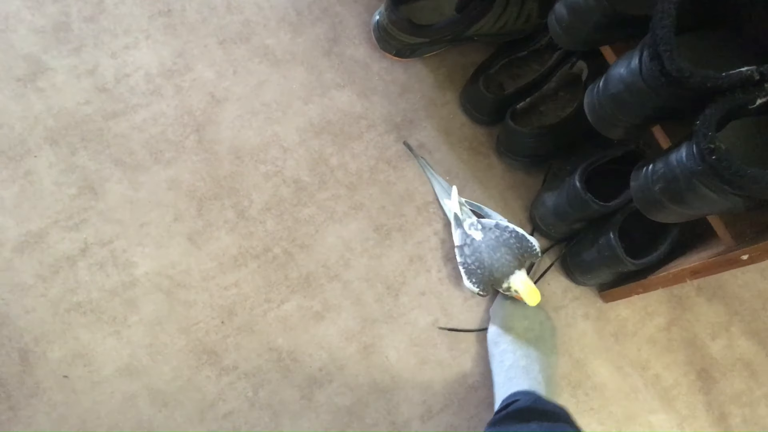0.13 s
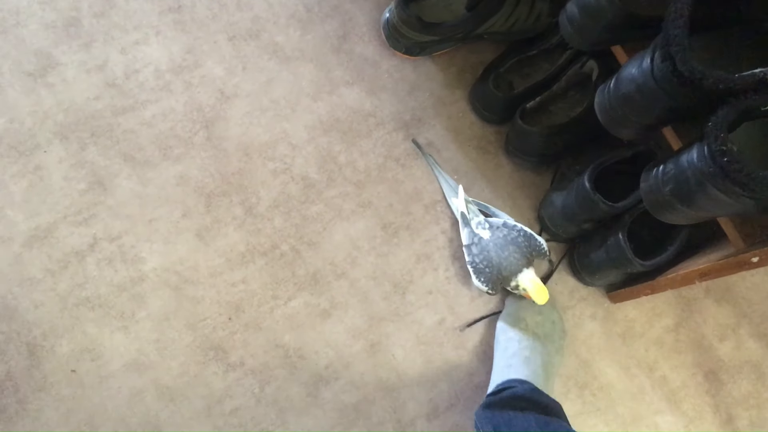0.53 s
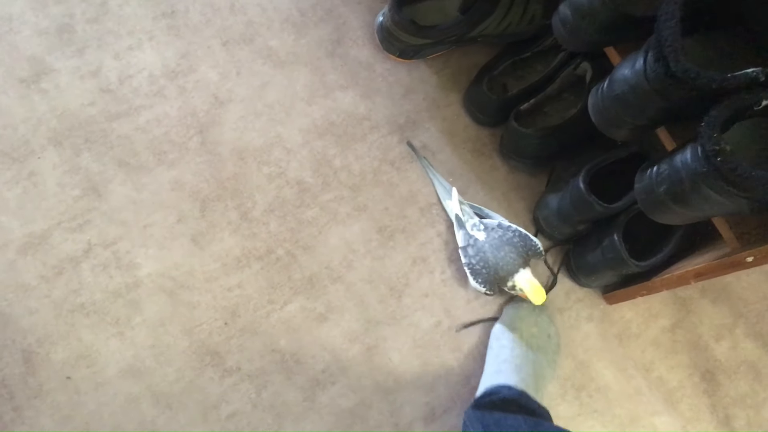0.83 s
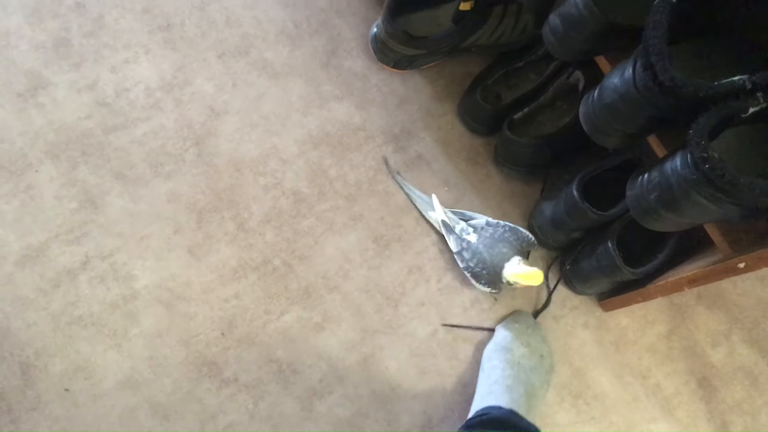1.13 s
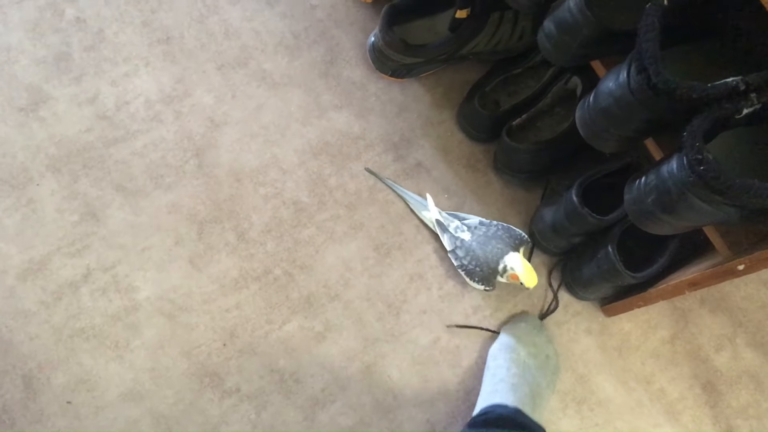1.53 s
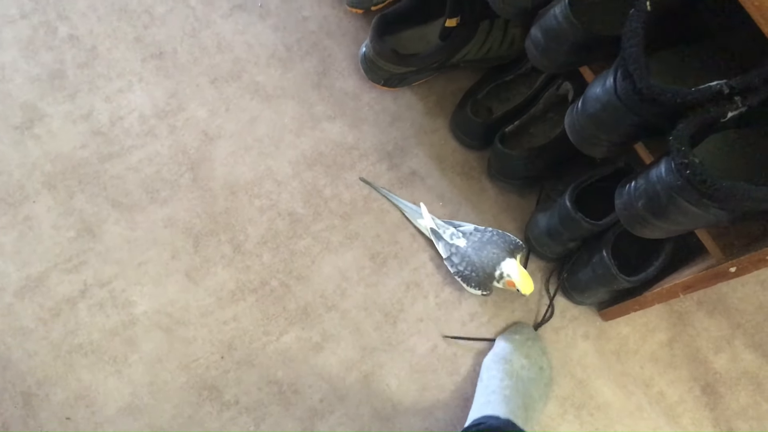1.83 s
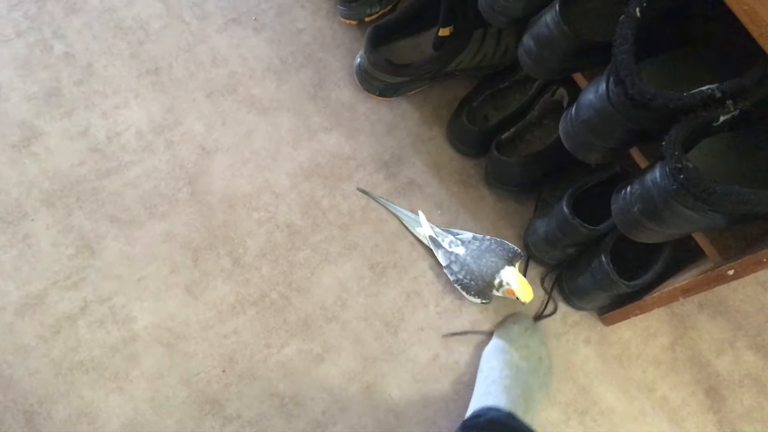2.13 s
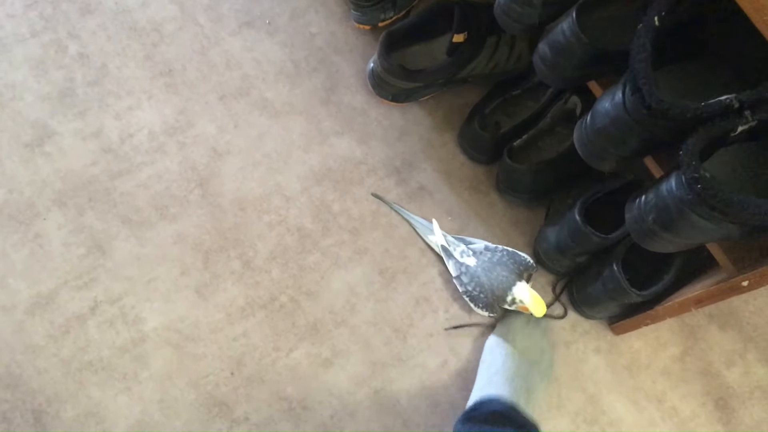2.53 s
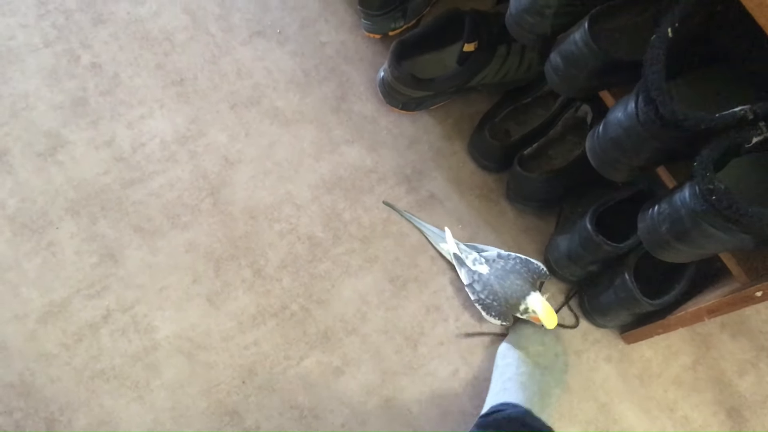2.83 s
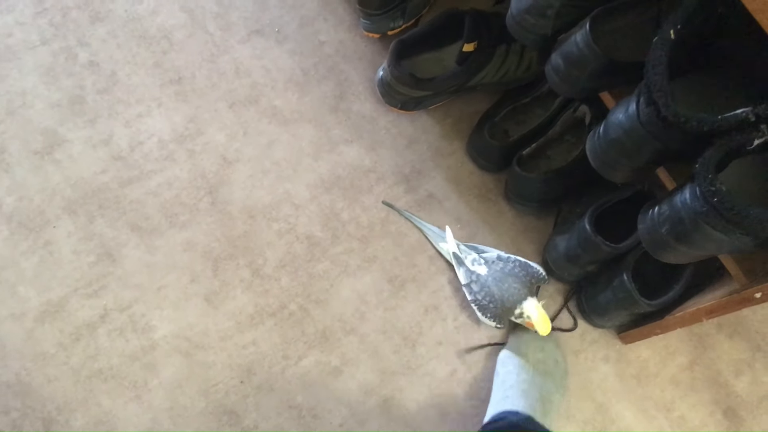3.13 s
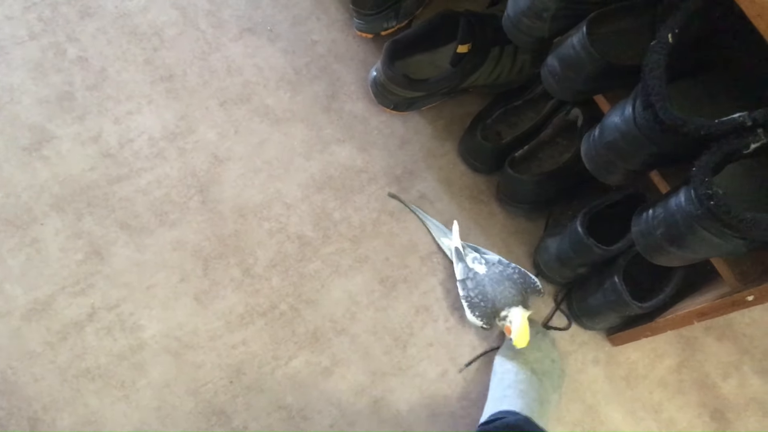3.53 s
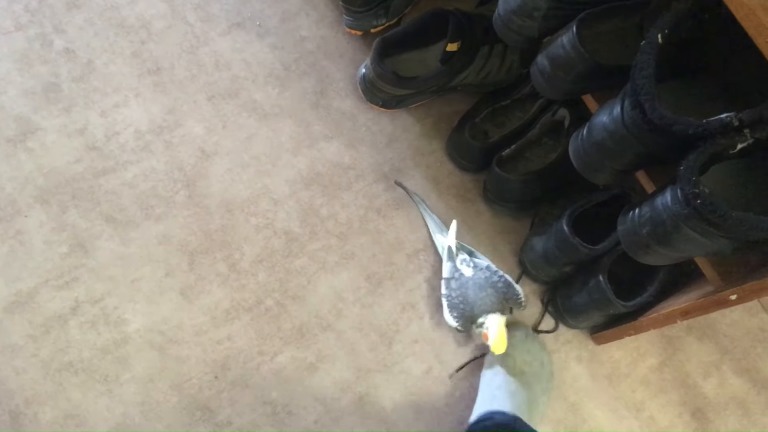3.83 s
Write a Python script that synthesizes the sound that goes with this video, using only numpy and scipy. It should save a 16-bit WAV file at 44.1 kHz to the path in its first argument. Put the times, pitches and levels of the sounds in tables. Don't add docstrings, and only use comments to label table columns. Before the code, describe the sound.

A small parrot chirps in a fast rhythmic series, pauses with ticks and rasps, then resumes

```python
import sys
import numpy as np
from scipy import signal
from scipy.fft import rfft, irfft
from scipy.io import wavfile
from scipy.ndimage import uniform_filter1d

SR = 44100
rng = np.random.default_rng(int(sys.argv[2]) if len(sys.argv) > 2 else 0)


def level_to_linear(level):
    exponent = np.asarray(level, float) / 20
    return 10 ** exponent


def wrap_up_sound(samples):
    columns = np.atleast_2d(samples).T
    tamed = np.clip(columns, -1, 1)
    steps = np.round(tamed * 32767).astype(np.int16)
    wavfile.write(sys.argv[1], SR, steps)


N = 176400

# (roughness [0-1], breath [dB])
CLEAR, HUSKY, HARSH, RAW = (.3, -22), (.4, -16), (.6, -10), (1.2, -3)


def coloured(x, points):
    hz, db = np.transpose(points)
    f = np.maximum(np.arange(len(x) // 2 + 1) * SR / len(x), 1)
    return irfft(rfft(x) * level_to_linear(np.interp(np.log(f), np.log(hz), db)), len(x))


def wander(size, hz):
    span = int(SR / hz)
    x = uniform_filter1d(uniform_filter1d(rng.standard_normal(N // 8), span), span)
    return x[:size] / x.std()


def add(out, start, x):
    i = int(start * SR)
    x = x[max(-i, 0):]
    i = max(i, 0)
    out[i:i + len(x)] += x[:N - i]


def resonance(x, hz, width):
    r = np.exp(-np.pi * width / SR)
    gain = (1 - r * r) / 2
    return signal.lfilter(np.array([1, 0, -1]) * gain, [1, -2 * r * np.cos(2 * np.pi * hz / SR), r * r], x)


def highpass(x, hz):
    return signal.sosfilt(signal.butter(4, hz, "high", fs=SR, output="sos"), x)


def song():
    # (frequency [Hz], width [Hz], level [dB])
    pipe_modes = [(1766, 390, -1), (2414, 615, 0), (3515, 520, 5.5), (4830, 960, 0), (5818, 720, 0),
                  (8050, 1400, -9.5), (12570, 3730, -11)]
    voice = long_chirps() + short_chirps() + flicks() + runups() + puffs() + level_notes() + mutter()
    voice = voice + 1e-18
    pipe = np.zeros(N)
    for k, (hz, width, db) in enumerate(pipe_modes):
        pipe += (-1) ** k * level_to_linear(db) * resonance(voice, hz, width)
    leak = resonance(voice, 583, 192) + level_to_linear(-5.0) * resonance(voice, 1074, 470)
    return highpass(pipe, 1490) + level_to_linear(-14) * highpass(leak, 450)


def long_chirps():
    # (time [s], second overtone [Hz], effort [dB])
    contours = [
        [(0.242, 4015, -23), (0.246, 4010, -25), (0.256, 4484, -20), (0.262, 4356, -21), (0.272, 3550, -26),
         (0.278, 3310, -23)],
        [(0.486, 3680, -23), (0.5, 4346, -21), (0.512, 4180, -23.5), (0.526, 3545, -24), (0.529, 3550, -23.5)],
        [(0.746, 3700, -20), (0.75, 3740, -19), (0.756, 4100, -25.5), (0.764, 4256, -24.5),
         (0.787, 3445, -23.5)],
        [(2.744, 3770, -16), (2.748, 3768, -23), (2.758, 4780, -23), (2.764, 4877, -21.5), (2.782, 4525, -23),
         (2.796, 3740, -25.5)],
        [(3.004, 4200, -22), (3.012, 4224, -23), (3.022, 4654, -21.5), (3.036, 4620, -24.5),
         (3.046, 4290, -24.5), (3.059, 3510, -24.5)],
        [(3.266, 3661, -22.5), (3.284, 4465, -22.5), (3.296, 4756, -24), (3.306, 4703, -24.5),
         (3.316, 3710, -24.5), (3.322, 3530, -24)],
        [(3.53, 3980, -21), (3.542, 4830, -21.5), (3.548, 4890, -23.5), (3.564, 4517, -21),
         (3.574, 3590, -26.5), (3.577, 3460, -20.5)],
        [(3.801, 4120, -13), (3.809, 4913, -22), (3.815, 4875, -19.5), (3.825, 4596, -24), (3.833, 3940, -24),
         (3.837, 3840, -23)],
    ]
    chirp_trims = [-1, -3, -2.5, 0.0, 0.0, -0.5, -0.5, 0.0]
    # (time of top [s], rise [s], fall [s], top [Hz], level [dB])
    opening = [
        (-.010, 0.017, .024, 2190, -22.5),
    ]
    # (time of top [s], rise [s], fall [s], top [Hz], level [dB])
    peaked = [
        (2.281, .034, 0.029, 2877, -22),
    ]
    snap_s, snap_share = .004, .88
    out = np.zeros(N)
    for rows, trim_db in zip(contours, chirp_trims):
        last_s, last_hz, last_db = rows[-1]
        s, second, db = np.transpose(list(rows) + [(last_s + snap_s, last_hz * snap_share, last_db)])
        t = np.arange(s[0], s[-1], 1 / SR)
        pitch = uniform_filter1d(np.interp(t, s, second / 2), size=200, mode="nearest")
        effort_db = trim_db + np.interp(t, s, db)
        add(out, s[0], syrinx(pitch, effort_db, 0.008, 0.0048, tilt_db=-0.5, first_db=2.0, third_db=-3.5,
                              grain=CLEAR, hiss_db=-19))
    out += arches(opening, 0.68, .68, 2.2, 2.5, 0.31, 0.078, tilt_db=-1.0, first_db=3.5, third_db=-2.0,
                  grain=CLEAR, hiss_db=-25)
    out += arches(peaked, .62, 0.62, 1.4, 1.9, 0.49, 0.09, tilt_db=0.5, third_db=-4.0,
                  grain=CLEAR, hiss_db=-44)
    return out


def short_chirps():
    # (time of top [s], rise [s], fall [s], top [Hz], level [dB])
    short_rows = [
        (.096, 0.016, 0.011, 2198, -25.5),
        (.359, 0.026, 0.013, 2283, -26.5),
        (.613, 0.021, 0.012, 2247, -22.5),
        (.875, 0.03, 0.0063, 2231, -24),
        (2.594, 0.013, 0.02, 2456, -27),
        (2.867, .009, 0.019, 2430, -28),
        (3.137, .017, .013, 2472, -25.5),
        (3.397, 0.0094, 0.02, 2353, -27.5),
        (3.652, 0.0097, 0.019, 2288, -23.5),
        (3.918, 0.014, 0.015, 2360, -25),
    ]
    # (time of top [s], rise [s], fall [s], top [Hz], level [dB])
    soft_rows = [
        (.998, .023, 0.0213, 1831, -34),
    ]
    out = arches(short_rows, .74, .82, 2.575, 2.2, 0.6, .45, tilt_db=-5.0, third_db=-2.0,
                 grain=CLEAR, hiss_db=-19.5)
    out += arches(soft_rows, 0.74, 0.92, 2.47, 2.3, 0.31, 0.82, tilt_db=-6.5, first_db=7.0,
                  grain=CLEAR, hiss_db=-19)
    return out


def flicks():
    # (time of top [s], rise [s], fall [s], top [Hz], level [dB])
    flick_rows = [(.113, 0.0033, 0.019, 1856, -37), (.373, 0.0024, 0.021, 1820, -40.5),
                  (.632, 0.005, 0.018, 2050, -34), (.892, .004, 0.02, 2010, -37),
                  (2.49, 0.0044, 0.014, 1960, -31), (2.627, 0.0065, 0.031, 1950, -29.5),
                  (2.894, .01, 0.025, 2895, -25), (3.160, 0.0054, 0.016, 2390, -31),
                  (3.419, 0.0046, 0.019, 2890, -27), (3.675, 0.0064, 0.019, 2960, -28.5),
                  (3.943, 0.0058, 0.02, 2643, -23.5)]
    return arches(flick_rows, 0.97, 0.56, 2.04, 1.5, 0.47, 0.24, tilt_db=-3.0, third_db=-7, dull_hz=9000,
                  grain=HUSKY, hiss_db=-27.5)


def runups():
    # (start [s], length [s], first pitch [Hz], last pitch [Hz], level [dB])
    runup_rows = [
        (.192, 0.037, 863, 1092, -30.5),
        (.451, 0.041, 646, 1530, -31.5),
        (.706, 0.041, 576.3, 1504, -30.5),
        (2.224, 0.028, 764, 985, -29.5),
        (2.708, 0.045, 800, 1395, -29.5),
        (2.972, 0.033, 762, 1354, -27.5),
        (3.237, .032, 752, 1460, -27.5),
        (3.497, 0.03, 791, 1366, -26.5),
        (3.76, 0.038, 857, 1008, -30),
    ]
    return glides(runup_rows, .022, 0.0021, tilt_db=-4.0, dull_hz=9340, first_db=-4.0, grain=RAW, hiss_db=-49)


def puffs():
    # (start [s], length [s], first pitch [Hz], last pitch [Hz], level [dB])
    puff_rows = [
        (.066, 0.018, 580, 1390, -37),
        (.326, 0.03, 590, 1405, -36.5),
        (.577, 0.034, 576, 1430, -34),
        (.837, 0.012, 577, 1370, -30),
        (.304, 0.0082, 1360, 600, -35),
        (.66, 0.018, 1403, 790, -36),
        (2.492, 0.0125, 1395, 593, -29),
        (2.645, 0.018, 1323, 587, -33.5),
        (3.962, 0.015, 980, 688, -34),
    ]
    return glides(puff_rows, .005, .005, tilt_db=-12, grain=HARSH, hiss_db=-32)


def level_notes():
    # (start [s], length [s], first pitch [Hz], last pitch [Hz], level [dB])
    level_rows = [
        (2.432, .034, 1800, 1870, -32),
        (3.765, 0.032, 1600, 2020, -28.5),
        (.222, .028, 1860, 2040, -25.5),
        (.196, 0.0239, 1730, 1990, -33),
        (2.464, 0.032, 1940, 1990, -23.5),
        (.712, 0.0193, 1300, 1900, -32.5),
        (.455, 0.027, 2300, 1700, -35),
    ]
    return glides(level_rows, 0.011, 0.0022, tilt_db=-3.5, first_db=4.0, grain=CLEAR, hiss_db=-16)


def mutter():
    # (start [s], length [s], first pitch [Hz], last pitch [Hz], level [dB])
    mutter_rows = [
        (1.648, .068, 900, 933, -30.5),
        (1.712, .068, 943, 993, -40),
    ]
    husky = glides(mutter_rows[:1], 0.0033, 0.019, tilt_db=-7.5, first_db=-9.0, third_db=-9,
                   grain=HUSKY, hiss_db=-41, dull_hz=8000)
    dull = glides(mutter_rows[1:], 0.0097, 0.041, tilt_db=0.0, first_db=8.0,
                  grain=HARSH, hiss_db=-18, dull_hz=3300)
    return husky + dull


def arches(rows, from_share, to_share, rise_power, fall_power, attack_share, release_share, **voice):
    out = np.zeros(N)
    for top, rise, fall, hz, db in rows:
        t = np.arange(-rise, fall, 1 / SR)
        climb = (1 - from_share) * abs(t / rise) ** rise_power
        drop = (1 - to_share) * abs(t / fall) ** fall_power
        pitch = hz * (1 - np.where(t < 0, climb, drop))
        add(out, top - rise, syrinx(pitch, db, attack_share * rise, release_share * fall, **voice))
    return out


def glides(rows, attack, release, **voice):
    out = np.zeros(N)
    for start, length, first, last, db in rows:
        pitch = np.linspace(first, last, int(length * SR))
        add(out, start, syrinx(pitch, db, attack, release, **voice))
    return out


def syrinx(pitch, db, attack, release, tilt_db, grain, hiss_db, dull_hz=20000, first_db=0.0, third_db=0.0):
    n = len(pitch)
    rough, breath_db = grain
    t = np.arange(n) / SR
    phase = 2 * np.pi * np.cumsum(pitch * (1 + .04 * rough * wander(n, 700))) / SR
    k = np.arange(1, 19)[:, None]
    flutter_db = 3.0 * np.resize(wander(N, 500), (len(k), n)) * np.where(k == 1, 1 / 3, 1)
    level_db = tilt_db * np.log2(k) + first_db * (k == 1) + third_db * (k == 3) + flutter_db
    audible = k * pitch < .36 * SR
    dulling = 1 + (k * pitch / dull_hz) ** 8
    tone = np.sum(level_to_linear(level_db) * np.sin(k * phase) * audible / dulling, axis=0)
    noise = rng.standard_normal(n + 4)
    hiss = np.diff(noise, 4)
    breath = (level_to_linear(breath_db) * noise[:n] + level_to_linear(hiss_db) * hiss) * (1 + np.cos(phase))
    shape = np.clip(t / attack, 0, 1) * np.clip((t[-1] - t) / release, 0, 1)
    tremble = level_to_linear(db + 3.5 * rough * wander(n, 300))
    return tremble * np.sin(shape * np.pi / 2) ** 2 * (tone + breath)


def chip():
    # (time of top [s], rise [s], fall [s], top [Hz], level [dB])
    chip_rows = [
        (1.4103, .0025, 0.00685, 1866, -17.5),
    ]
    beak_band = [1600, 10500]
    x = arches(chip_rows, 0.97, 0.83, 1.85, 2.36, 1.0, 0.49, tilt_db=-2.5, first_db=-13.0, third_db=2.0,
               grain=HUSKY, hiss_db=-58, dull_hz=11500)
    return signal.sosfilt(signal.butter(2, beak_band, "band", fs=SR, output="sos"), x + 1e-18)


def rasps():
    # (start [s], length [s], first resonance [Hz], last resonance [Hz], level [dB])
    rasp_rows = [
        (1.648, 0.035, 4400, 4250, -37.5),
        (1.686, 0.11, 2940, 2640, -39),
        (1.829, 0.13, 4230, 2060, -34.5),
    ]
    rasp_hiss_levels = [-41, -9, -21.5]
    rasp_hiss_widths = [2000, 2000, 7000]
    clicks_per_s, sharpness = 900, .25
    out = np.zeros(N)
    for (start, length, first, last, db), hiss_db, wide in zip(rasp_rows, rasp_hiss_levels, rasp_hiss_widths):
        u = np.arange(int(length * SR)) / length / SR
        chance, height = rng.random((2, len(u)))
        clicks = (chance < clicks_per_s / SR) * (height - .5) + 0.12 * (height - .5)
        centre = first * (last / first) ** u
        x = np.zeros(len(u))
        for hz in np.geomspace(540, 8000, 18):
            band = resonance(resonance(clicks, hz, sharpness * hz), hz, sharpness * hz)
            spill = .04 * (1 - u) ** 2 if hz > first else .2
            x += band * (np.exp(-(np.log(hz / centre) / .24) ** 2) + spill)
        hiss_hz = 12300 + wide / 4
        hiss = resonance(resonance(clicks, hiss_hz, wide), hiss_hz, wide)
        x += level_to_linear(hiss_db) * hiss * np.sin(np.pi * u ** 0.74)
        x = highpass(x, 450) * level_to_linear(2 * wander(len(u), 990))
        envelope = np.minimum(u / .1, 1) * level_to_linear(-11 * u) * (1 - u ** 4)
        add(out, start, level_to_linear(db) * x / x.std() * envelope)
    return out


def ticks():
    # (time [s], peak level [dB])
    tick_rows = [
        (1.0457, -25.5),
        (1.385, -36),
        (1.8014, -40),
        (2.1743, -35.5),
    ]
    out = np.zeros(N)
    decay = np.exp(-np.arange(80) / SR / 0.00029)
    for s, db in tick_rows:
        add(out, s, level_to_linear(db + 0.5) * rng.standard_normal(80) * decay)
    return resonance(out + 1e-18, 4900, 6600)


def hall(x):
    # (delay [s], level [dB])
    echo_rows = [
        (.0055, -12.5),
        (.015, -11),
    ]
    low_t60_s, high_t60_s, gap_s = 0.35, 0.25, 0.0022
    t = np.arange(SR // 2) / SR
    noise = rng.standard_normal(len(t))
    low = signal.sosfilt(signal.butter(2, 7400, fs=SR, output="sos"), noise)
    tail = low * level_to_linear(-60 * t / low_t60_s) + (noise - low) * level_to_linear(-60 * t / high_t60_s)
    tail *= np.clip(t / gap_s - 1, 0, 1)
    tail *= level_to_linear(-5) / np.sqrt(np.sum(tail ** 2))
    for s, db in echo_rows:
        tail[int(s * SR)] += level_to_linear(db)
    return signal.fftconvolve(x, tail)[:N]


def microphone(x):
    # (frequency [Hz], level [dB])
    mic_curve = [(400, 3), (6000, -1.5), (9400, -13), (10150, -33), (11100, -5.5), (12200, 2.5),
                 (13400, -9.5), (15800, 1)]
    return coloured(x, mic_curve)


def room_noise():
    # (frequency [Hz], level per Hz [dB])
    noise_curve = [(30, -16), (48, 1.5), (90, -9), (220, -10), (400, -15), (850, -13.5), (1500, -8),
                   (15500, -25)]
    noise = coloured(rng.standard_normal(N), noise_curve)
    return level_to_linear(-57) * noise / noise.std()


def scene():
    bird = song() + chip() + rasps() + ticks()
    return (microphone(bird + hall(bird)) + room_noise())[None]


def low_pass(x):
    return signal.sosfilt(signal.butter(12, 15920, fs=SR, output="sos"), x)


def record(dry):
    # (time [s], length [s], level [dB])
    clamp_rows = [
        (1.195, 0.066, -7),
        (1.345, 0.052, -9.5),
        (1.544, 0.055, -5.5),
        (2.123, 0.043, -10),
    ]
    t = np.arange(N) / SR
    clamp = level_to_linear(sum(db * np.exp(-((t - s) / length) ** 4) for s, length, db in clamp_rows))
    low = signal.sosfiltfilt(signal.butter(2, 300, fs=SR, output="sos"), dry)
    reduced = low + clamp * (dry - low)
    mix = signal.sosfilt(signal.cheby2(20, 60, 16030, fs=SR, output="sos"), reduced)
    return low_pass(mix)


dry = scene()
out = record(dry)
wrap_up_sound(out)
```